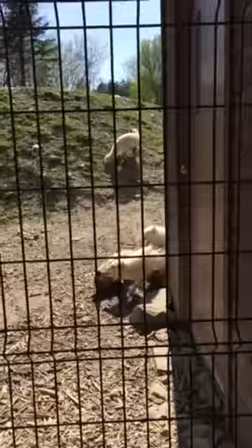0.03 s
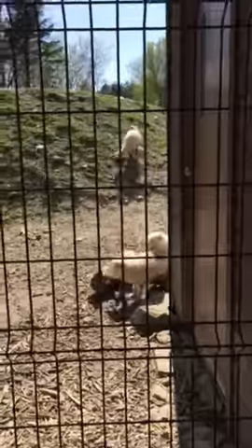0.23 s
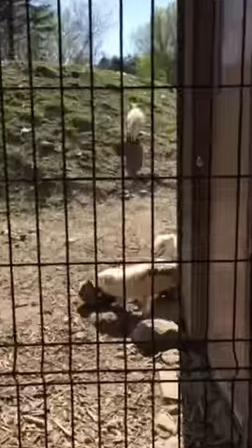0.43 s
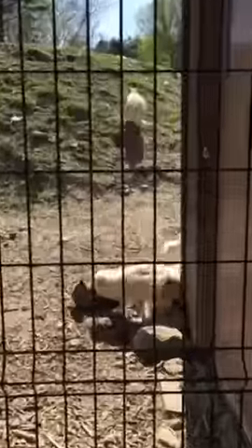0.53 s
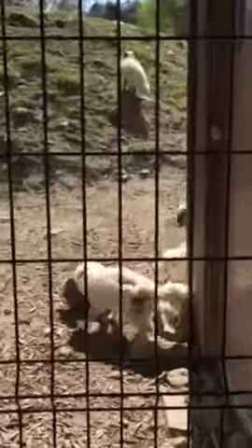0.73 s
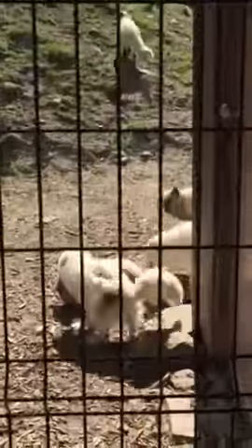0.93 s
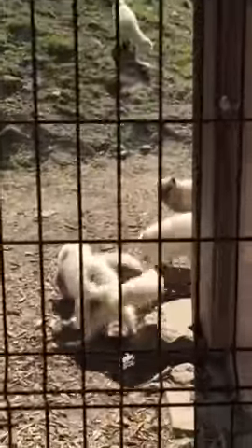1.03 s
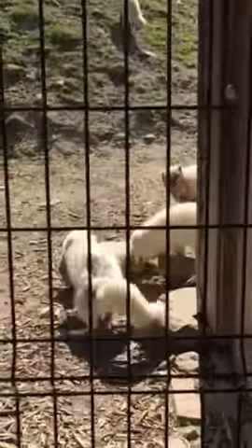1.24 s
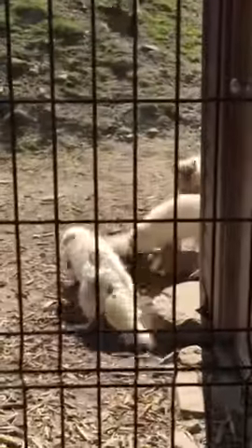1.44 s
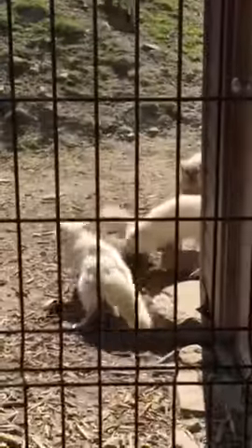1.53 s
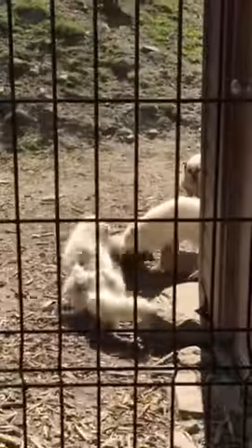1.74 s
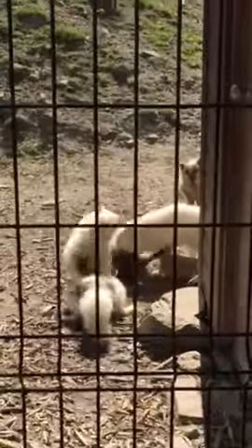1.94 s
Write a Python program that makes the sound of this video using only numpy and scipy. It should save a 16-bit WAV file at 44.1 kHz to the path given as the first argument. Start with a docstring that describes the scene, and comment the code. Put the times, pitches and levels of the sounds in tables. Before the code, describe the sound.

Squabbling foxes give a quick run of shrill, raspy, fluttering screeches outdoors.

```python
"""Foxes squabbling over food.

Foxes screech in an outdoor pen, a few metres away. Each screech is a high wavering tone buried in
throat rasp, both chopped by a flutter of about 70-150 beats/s. Thin whines, dry throat clicks and
faint ticks go with them. Ground, fence and wall return short echoes over a lumpy low rumble."""
import sys
import numpy as np
from scipy import signal
from scipy.fft import rfft, irfft, next_fast_len
from scipy.io import wavfile
from scipy.ndimage import uniform_filter1d

SR = 44100
rng = np.random.default_rng(int(sys.argv[2]) if len(sys.argv) > 2 else 0)


def generate_wav(signal):
    """Clip the signal to [-1, 1] and save it as 16-bit WAV at the path in sys.argv[1]."""
    frames = np.transpose(np.atleast_2d(signal))
    scaled = np.clip(frames, -1, 1) * 32767
    pcm = np.round(scaled).astype(np.int16)
    wavfile.write(sys.argv[1], SR, pcm)


N = 88200

# Rasp per screech: t/s, level/dB at 1.45-2.4 kHz, then offset/dB at 0.9-1.45, 2.4-4.5, >4.5 kHz
RASP_ENVELOPES = [
    [(0.084, -29, -17, 6.5, -0.5), (0.092, -25.5, -8.5, 9.5, -13), (0.116, -37, -4, 11, -6),
     (0.136, -37.5, -13, 10, 3), (0.192, -26.5, -26, 1, -1), (0.196, -25, -25, -8, -6.5),
     (0.232, -16.5, -23, 4, -1), (0.27, -18, -12.5, 5, -5), (0.28, -37, -9, 19.5, 10),
     (0.29, -30, 1, -1, -7)],
    [(0.29, -28, -1, -5, -7), (0.306, -34, -2, 12, 4.5), (0.322, -46, -35, -2, -14),
     (0.336, -31.5, -27, 8, 1), (0.424, -22.5, -7.5, 0.5, -6.5), (0.444, -20, -20, -6, -18),
     (0.482, -18.5, -14.5, -2, -15), (0.54, -18, -15.5, -6.5, -25), (0.564, -41.5, 5.5, 9, -8),
     (0.6, -48.5, 4, -3, -2)],
    [(0.6, -52, 5, 8, 0), (0.68, -44, -1, 6, 5), (0.69, -35, -2, 6, 0), (0.736, -32, -1, 7, 2),
     (0.79, -21, -9, -5.5, -14.5), (0.848, -29.5, -12, -4.5, -23), (0.866, -54, -9, 3, -11),
     (0.902, -53.5, -12, -1.5, -15), (0.976, -66, 3, 6.5, -9), (0.992, -64, -28.5, -6, -16),
     (1.05, -82, 8, 3, -4)],
    [(1.063, -40.5, -2, 5.5, -17), (1.087, -29.5, -9, -3, -17), (1.101, -32.5, -1, 8.5, -4.5),
     (1.171, -30, 2, -2.5, -10.5), (1.193, -27, -4, -3.5, -12.5), (1.207, -21, -14, -14, -23),
     (1.291, -25, -5, -9.5, -27), (1.341, -57, -15, 3.5, -16), (1.387, -55.5, -22, -11, -26),
     (1.42, -57, 4.5, -9, -10)],
    [(1.432, -46.5, 1, 2, -1.5), (1.466, -25.5, -13.5, -6.5, -7.5), (1.526, -27, 2, 0.5, -7),
     (1.594, -35, -10, -1.5, -13), (1.618, -42, 2, 5, 0), (1.632, -40, 2, 5, -4), (1.652, -40, 3, 0, -12),
     (1.712, -83, -10, 14, 3), (1.78, -55.5, -14, -12, -24), (1.795, -66, 16, -4, 11)],
    [(1.803, -54, -5, -1, 6), (1.813, -41.5, -4, 4.5, -8), (1.837, -33.5, -4, 9, -3),
     (1.86, -40, 3, -3, -5), (1.88, -38, -2, 5, -6), (1.919, -30, -8.5, 7, -6),
     (1.965, -28, -6, -4.5, -16.5), (1.973, -31, -7, -5, -19), (1.985, -51, -3, 3, 0),
     (2.0, -46, -16, 4, -2)],
]
# Throat noise spectrum: f/Hz, level/dB
RASP_SPECTRUM = [(350, -29), (600, 9), (839, -28.5), (913, -23.5), (1060, -23), (2110, -4), (2270, 0),
                 (3400, -2), (5470, -8), (10400, -28), (17000, -34.5)]
# Lower edges of the rasp bands: f/Hz
RASP_EDGES_HZ = [900, 1450, 2400, 4500]
# Fixed ringing peaks colouring the rasp of every screech: f/Hz, width/Hz, gain/dB
FIXED_RESONANCES = [(1890, 450, -4), (2090, 90, -5), (2550, 63, -1), (3260, 37, -0.5), (4000, 120, -14)]
# Voiced stretches: t/s, f/Hz, level/dB of partials 1, 2, 3
VOICED_STRETCHES = [
    [(0.085, 724.9, -50, -71, -20), (0.105, 719, -37.5, -51, -26.5), (0.108, 780, -37, -47, -36)],
    [(0.113, 1914, -54, -42, -60), (0.119, 1862, -42, -47, -61), (0.147, 1876, -33, -29, -60),
     (0.193, 2025, -30.5, -33, -58), (0.197, 2020, -23, -41, -60)],
    [(0.2, 1791, -65, -34, -48), (0.232, 1735, -25, -16.5, -37), (0.248, 1729, -36, -20, -34),
     (0.276, 1772, -21, -30, -29.5), (0.285, 1784, -52, -44, -52)],
    [(0.287, 1600, -36, -31, -50), (0.307, 1590, -35, -29, -42), (0.32, 1660, -25, -29, -31),
     (0.345, 1650, -21, -28, -33), (0.36, 1665, -22, -29, -38)],
    [(0.362, 1680, -22, -32, -38), (0.39, 1715, -22, -32, -35), (0.422, 1784, -26.5, -38, -37),
     (0.492, 1753, -27.5, -23, -33.5), (0.542, 1734, -34, -24.5, -38.5), (0.56, 1670, -76, -41.5, -71)],
    [(0.59, 1120, -50, -62, -60), (0.607, 1190, -48, -46, -50), (0.616, 1320, -46, -37, -38),
     (0.632, 1390, -46, -42, -41), (0.642, 1620, -46, -40, -44), (0.665, 1700, -46, -40, -48),
     (0.682, 1600, -58, -50, -60)],
    [(0.684, 1240, -40, -36, -36), (0.696, 1300, -36, -23, -35), (0.714, 1400, -37, -28, -27),
     (0.73, 1450, -33, -29, -30), (0.755, 1560, -32, -28, -30), (0.77, 1520, -36, -30, -38)],
    [(0.773, 1043, -34, -24, -28), (0.795, 1057, -69, -36, -45), (0.817, 1014, -61, -29, -35),
     (0.843, 1078, -43, -37.5, -42), (0.865, 956, -42, -74, -47)],
    [(1.063, 1623, -45.5, -38.5, -55), (1.089, 1661, -37, -30, -42), (1.113, 1564, -47, -29, -36),
     (1.131, 1780, -36, -26.5, -44), (1.14, 1760, -57, -38, -50)],
    [(1.143, 959, -54, -25, -30), (1.195, 942, -75, -36, -37.5), (1.215, 1020, -63, -56, -36),
     (1.291, 1001, -42, -36, -35), (1.32, 1020, -44, -64, -69)],
    [(1.433, 1013, -64, -40, -43), (1.443, 1020, -48, -56, -41), (1.451, 1005, -63, -35.5, -34),
     (1.519, 1008, -59, -41, -31.5), (1.55, 1004, -42, -46, -41)],
    [(1.545, 1510, -36, -31, -36), (1.59, 1490, -44, -36, -35), (1.612, 1450, -40, -29, -33),
     (1.632, 1430, -36, -29, -36), (1.645, 1400, -50, -45, -54), (1.72, 1390, -76, -64, -80)],
    [(1.81, 1617, -39, -67, -64), (1.818, 1606, -34, -43, -49), (1.83, 1623, -45, -35, -54),
     (1.84, 1576, -46, -62, -32), (1.855, 1520, -64, -28, -55)],
    [(1.874, 1479, -35, -37, -35), (1.89, 1511, -37, -29, -37.5), (1.9, 1576, -35, -28.5, -40),
     (1.946, 1621, -29, -29.5, -60), (1.968, 1430, -32, -28.5, -52), (1.98, 1500, -43, -48, -68)],
]
# Strong-weak cycle alternation per stretch: depth/dB
SUBHARMONIC_DB = [-43, -29, -14.5, -41, -33, -57, -23, -23, -20, -15, 0, -11, -17, -5.5]
# Pitch jitter per stretch: rms/Hz
PITCH_JITTER_HZ = [40, 60, 40, 45, 50, 28, 42, 35, 50, 45, 45, 40, 50, 42]
# Flutter phase: t/s, count/beats
FLUTTER_BEATS = [(.091, 0), (.121, 2), (.141, 3), (.165, 5), (.191, 7), (.235, 10), (.268, 13), (.297, 16),
                 (.317, 18), (.339, 21), (.365, 25), (.392, 29), (.445, 37), (.503, 46), (.56, 55),
                 (.616, 60), (.654, 64), (.686, 67), (.713, 70), (.737, 73), (.757, 75), (.782, 78),
                 (.82, 82), (.865, 87), (1.065, 100), (1.098, 103), (1.125, 105), (1.149, 107),
                 (1.182, 110), (1.216, 114), (1.258, 119), (1.287, 122), (1.322, 126), (1.433, 140),
                 (1.483, 145), (1.53, 150), (1.579, 155), (1.628, 160), (1.655, 163), (1.817, 180),
                 (1.837, 182), (1.863, 185), (1.878, 187), (1.9, 190), (1.915, 192), (1.932, 194),
                 (1.952, 196), (2, 201)]
# Flutter depth: t/s, depth/dB
FLUTTER_DEPTH_DB = [(.084, 3), (.105, 6), (.115, 24), (.2, 20), (.22, 8), (.285, 9), (.3, 17), (.35, 12),
                    (.4, 5), (.56, 4), (.61, 9), (.645, 14), (.655, 14), (.68, 14), (.69, 4), (.86, 5),
                    (1.06, 20), (1.09, 17), (1.11, 5), (1.16, 9), (1.3, 5), (1.43, 16), (1.47, 5),
                    (1.55, 6), (1.63, 11), (1.66, 6), (1.81, 7), (2, 6)]
# Contour per whine: t/s, f/Hz, level/dB
WHINE_CONTOURS = [
    [(0.36, 928, -42), (0.524, 900, -42.5), (0.53, 938.7, -58)],
    [(1.63, 1039, -46), (1.648, 1005, -34.5), (1.675, 950, -48)],
    [(1.915, 596, -40.5), (1.949, 608, -38), (1.965, 520, -40)],
]
# Throat clicks: t/s, level/dB
THROAT_CLICKS = [(.6362, -23), (.6432, -19), (.652, -5), (.6613, -5), (.6722, -14), (.6842, -12)]
# Modes rung by a click: f/Hz, level/dB
CLICK_RING_MODES = [(1680, -20), (3350, 0), (4050, -8), (5050, -6), (6650, -10), (8400, -16)]
# Ticks in a pause: t/s, level/dB
FAINT_TICKS = [(1.6803, -49), (1.690, -54), (1.716, -55), (1.730, -54), (1.742, -55), (1.791, -51)]
# Ground and fence reflections: delay/s, gain/dB
REFLECTIONS = [(.0019, -11), (.0034, -11), (.0057, -14)]
# Background spectrum: f/Hz, level/dB
RUMBLE_SPECTRUM = [(15, -55), (25, -5.5), (118, -2.5), (228, -5), (393, -3.5), (561, -16.5), (626, -7),
                   (845, -19), (942, -35), (2140, -24.5), (4710, -47), (10200, -48), (15200, -59),
                   (17000, -62)]

LOW_CUT_HZ, HIGH_CUT_HZ = 40, 17700


def rasp():
    """Throat noise, coloured by fixed ringing peaks, in four bands weighted per screech."""
    noise = shaped_noise(RASP_SPECTRUM)
    for hz, width_hz, db in FIXED_RESONANCES:
        r = np.exp(-np.pi * width_hz / SR)
        zeros = [(1 - r * r) / 2, 0, (r * r - 1) / 2]
        poles = [1, -2 * r * np.cos(2 * np.pi * hz / SR), r * r]
        noise = noise + amp(db) * signal.lfilter(zeros, poles, noise)
    edges_hz = RASP_EDGES_HZ + [HIGH_CUT_HZ]
    low, core, mid, high = [dense_band(noise, a, b) for a, b in zip(edges_hz, edges_hz[1:])]
    out = 0
    for screech in RASP_ENVELOPES:
        (db, low_db, mid_db, high_db), window = contours(screech)
        mix = core + amp(low_db) * low + amp(mid_db) * mid + amp(high_db) * high
        out = out + window * amp(db) * mix
    return out


def voice(beats, depth_db, gain_db=6, shimmer_db=1.5, chirp_per_db=.002, slope_db=-9.5):
    """Six jittered partials; alternating strong and weak cycles add lines halfway between."""
    out, jitter = 0, drift(400)
    chirp = 1 + chirp_per_db * depth_db * np.sin(2 * np.pi * beats)  # pitch swings with each beat
    wobble_db = [shimmer_db * drift(180) for _ in range(4)]
    for stretch, sub_db, jitter_hz in zip(VOICED_STRETCHES, SUBHARMONIC_DB, PITCH_JITTER_HZ):
        (hz, *partial_db), window = contours(stretch)
        phase = 2 * np.pi * np.cumsum(hz * chirp + jitter_hz * jitter) / SR
        partial_db += [partial_db[2] + slope_db * k for k in range(1, 4)]
        partials = sum(amp(db + wobble_db[k % 4]) * np.sin((k + 1) * phase + k * k)
                       for k, db in enumerate(partial_db))
        alternation = 1 + amp(sub_db) * np.cos(phase / 2)
        out = out + window * amp(gain_db) * partials * alternation
    return out


def flutter(beats, depth_db, rise_beats=.3, lead_beats=.12, stray_beats=.04):
    """Chopping gain, rms near 1: each beat opens fast and closes slower."""
    position = (beats + lead_beats + stray_beats * drift(38)) % 1
    closure = np.interp(position, [0, 1 - rise_beats, 1], [0, 1, 0])
    uneven_db = drift(27) + drift(270)
    gain = amp(uneven_db - depth_db * uniform_filter1d(closure, size=40))
    return gain / np.sqrt(uniform_filter1d(gain ** 2, size=1200))


def whines(waver_hz=8):
    """Thin wavering sines under the screeches."""
    out = 0
    for whine in WHINE_CONTOURS:
        (hz, db), window = contours(whine)
        phase = 2 * np.pi * np.cumsum(hz + waver_hz * drift(55)) / SR
        out = out + window * amp(db) * np.sqrt(2) * np.sin(phase)
    return out


def clicks(swell_s=.0009, t60_s=.011):
    """Each click rings the throat briefly: quick swell, fast decay."""
    t, out = np.arange(N) / SR, 0
    for start_s, db in THROAT_CLICKS:
        age_s = np.maximum(t - start_s, 0)
        swell = np.minimum(age_s / swell_s, 1) ** 2
        envelope = swell * amp(db - 60 * np.maximum(age_s - swell_s, 0) / t60_s)
        for hz, mode_db in CLICK_RING_MODES:
            half_turns, stray = rng.uniform(-1.1, 1, 2)
            ring = np.sin(2 * np.pi * hz * age_s + np.pi * half_turns)
            out = out + envelope * amp(mode_db - 5 + 2 * stray) * ring
    return out


def reflections(x):
    """Delayed copies off ground and fence."""
    n = np.arange(N)
    return sum(amp(db) * np.interp(n - delay_s * SR, n, x) for delay_s, db in REFLECTIONS)


def wall_echo(x, gain_db=-23.5, t60_s=.31, cut_hz=1660):
    """Dull echo off wall and ground: ten low-passed feedback delays."""
    size = next_fast_len(N + SR)
    hz = np.fft.rfftfreq(size, 1 / SR)
    lowpass = 1 / (1 + 1j * hz / cut_hz)
    response = 0
    for k, delay_s in enumerate(np.geomspace(.017, .053, 10)):
        loop = amp(-60 * delay_s / t60_s) * lowpass * np.exp(-2j * np.pi * hz * delay_s)
        response = response + (-1) ** k * loop / (1 - loop)
    return amp(gain_db) * irfft(rfft(x, size) * response, size)[:N]


def ticks(decay_s=.005, band_hz=(4000, 14000)):
    """Faint decaying puffs of bright noise."""
    t = np.arange(N) / SR
    envelope = sum(amp(db - 4.5) * (t >= start_s) * np.exp(-np.abs(t - start_s) / decay_s)
                   for start_s, db in FAINT_TICKS)
    return envelope * unit_rms(bandpass(rng.standard_normal(N), *band_hz))


def rumble(level_db=-39, swell_db=1.8):
    """Distant outdoor rumble; octaves swell partly together, partly alone."""
    noise = shaped_noise(RUMBLE_SPECTRUM)
    out, common = 0, .6 * drift(14)
    for low_hz in 20 * 2. ** np.arange(10):
        octave = bandpass(noise, low_hz, min(2 * low_hz, 20000))
        out = out + amp(swell_db * (common + drift(9.9))) * octave
    return amp(level_db) * unit_rms(out)


def amp(db):
    return 10 ** (np.asarray(db) / 20)


def unit_rms(x):
    return x / np.sqrt(np.mean(x ** 2) + 1e-20)


def contours(rows, fade_s=.003):
    """Columns interpolated per sample, and a window fading outside their time span."""
    times_s, *columns = np.transpose(rows)
    t = np.arange(N) / SR
    window = np.clip(1 + np.minimum(t - times_s[0], times_s[-1] - t) / fade_s, 0, 1)
    return [np.interp(t, times_s, column) for column in columns], window


def drift(rate_hz):
    """Low-passed random wander, rms 1."""
    r = np.exp(-2 * np.pi * rate_hz / SR)
    return unit_rms(signal.lfilter([1], [1, -2 * r, r * r], rng.standard_normal(N + SR))[SR:])


def shaped_noise(spectrum):
    """Noise with the given spectrum, interpolated over log f."""
    hz, db = np.transpose(spectrum)
    bins_hz = np.fft.rfftfreq(N, 1 / SR) + 1
    gain = amp(np.interp(np.log(bins_hz), np.log(hz), db))
    return irfft(rfft(rng.standard_normal(N)) * gain, N)


def bandpass(x, low_hz, high_hz):
    return signal.sosfilt(signal.butter(2, [low_hz, high_hz], "band", fs=SR, output="sos"), x)


def dense_band(noise, low_hz, high_hz, window_s=.0015):
    """Noise band with its level evened: dense, not crackling; rms 1."""
    x = bandpass(noise, low_hz, high_hz)
    power = uniform_filter1d(x ** 2, size=int(window_s * SR)) + .058 * np.mean(x ** 2)
    return unit_rms(bandpass(x / np.sqrt(power), low_hz, high_hz))


def scene():
    """Foxes, echoes, ticks and rumble; mono."""
    (beats,), _ = contours(FLUTTER_BEATS)
    (depth_db,), _ = contours(FLUTTER_DEPTH_DB)
    calls = flutter(beats, depth_db) * (rasp() + voice(beats, depth_db)) + whines()
    foxes = calls + reflections(calls) + clicks()
    return (foxes + wall_echo(foxes) + ticks() + rumble())[None]


def record(dry):
    """Silent lead-in, gain control on loud calls, low and high cut."""
    start_s = .0838
    threshold_db, reduction_per_db, memory_s = -34.5, .27, .086
    x = dry * (np.arange(N) >= start_s * SR)
    pole = np.exp(-1 / (memory_s * SR))
    level_db = 10 * np.log10(signal.lfilter([1 - pole], [1, -pole], x ** 2) + 1e-12)
    x = x * amp(-reduction_per_db * np.maximum(level_db - threshold_db, 0))
    x = signal.sosfilt(signal.butter(4, LOW_CUT_HZ, "high", fs=SR, output="sos"), x)
    return signal.sosfilt(signal.cheby2(16, 40, HIGH_CUT_HZ, fs=SR, output="sos"), x)


dry = scene()
out = record(dry)
generate_wav(out)
```